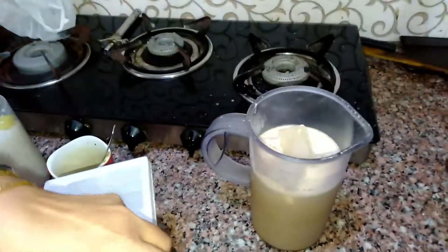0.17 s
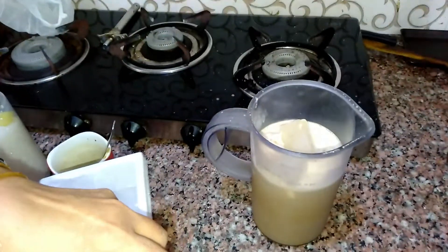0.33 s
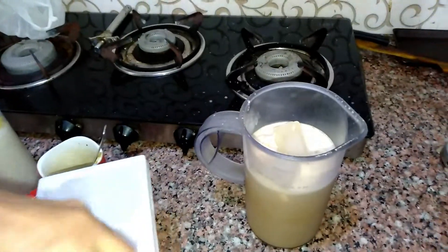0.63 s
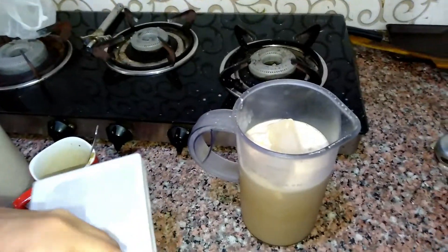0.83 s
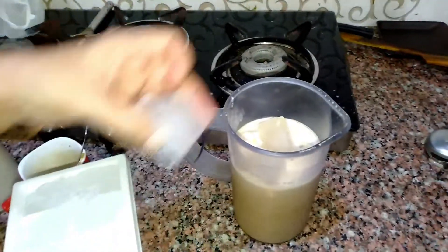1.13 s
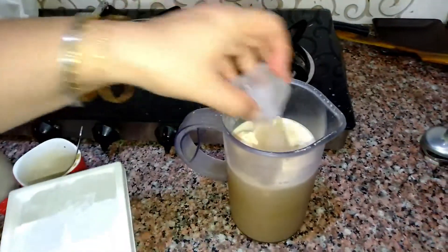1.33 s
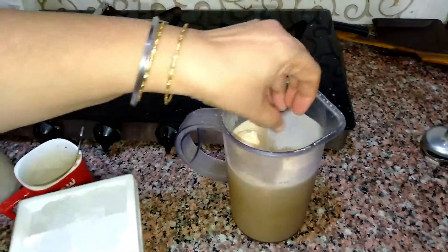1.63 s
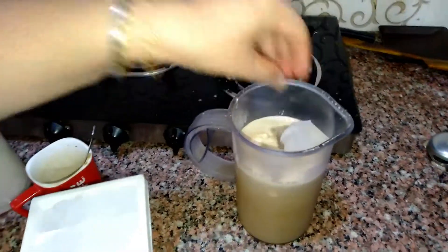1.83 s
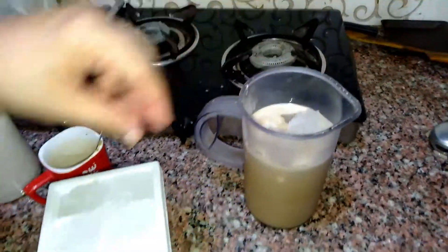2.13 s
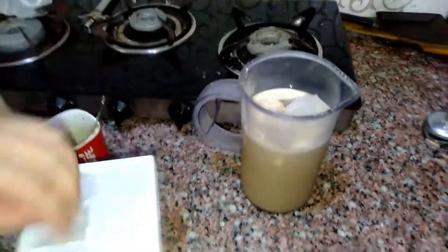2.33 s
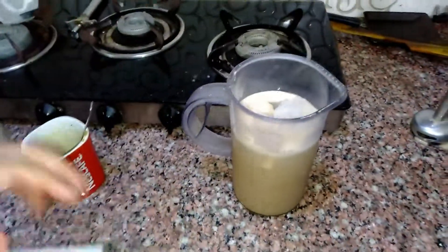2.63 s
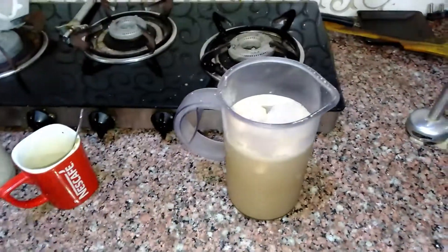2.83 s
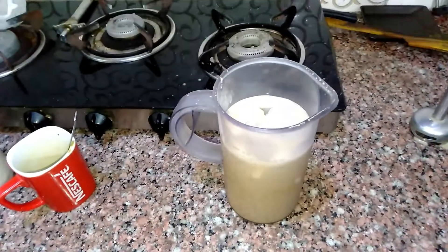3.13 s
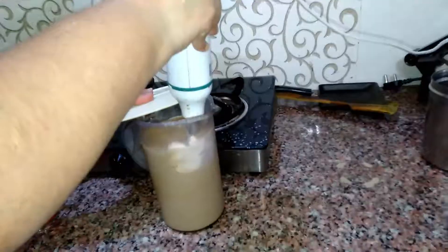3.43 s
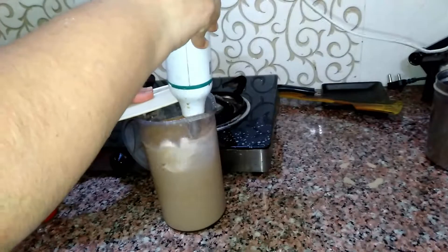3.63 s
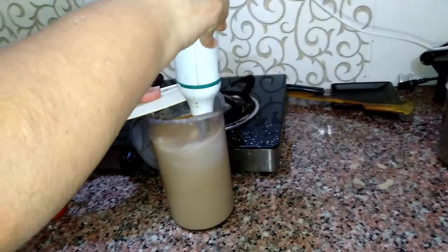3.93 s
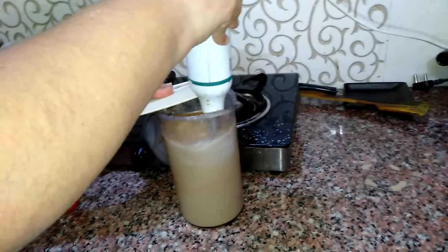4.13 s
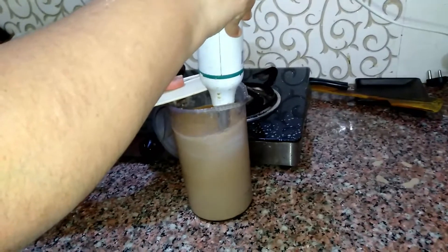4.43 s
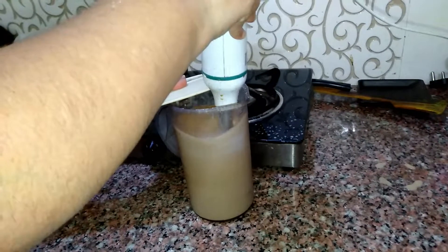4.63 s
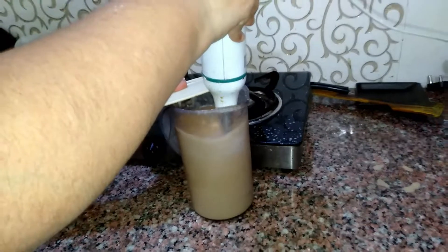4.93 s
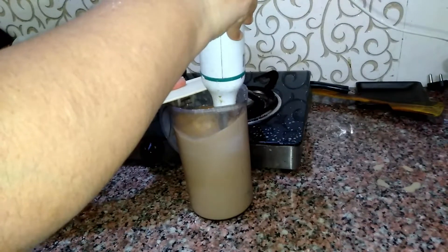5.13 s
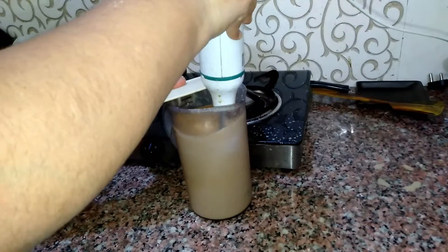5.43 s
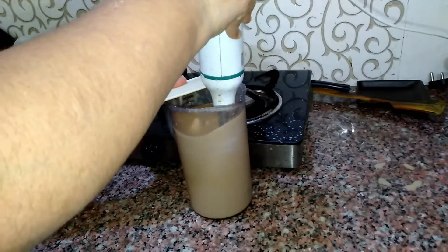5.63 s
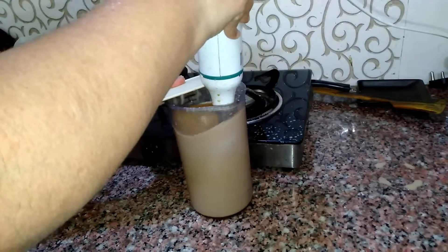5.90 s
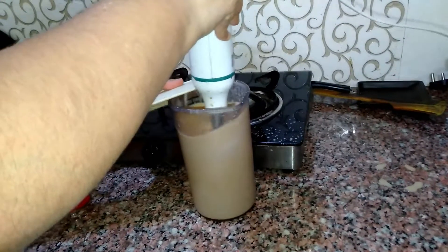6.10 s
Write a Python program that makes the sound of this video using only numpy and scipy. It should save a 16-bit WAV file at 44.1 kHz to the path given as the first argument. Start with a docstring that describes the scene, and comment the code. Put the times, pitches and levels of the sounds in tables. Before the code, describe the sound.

A handheld microphone with a bright, slightly processed sound catches brittle ice snaps and grainy rubbing, then one short hollow knock in a part-filled plastic jug. Quiet handling and faint wavering background tones continue until an electric hand blender suddenly takes over, already running: a thick wandering hum, wet churning and ticking ice chips, its pitch falling sharply near the end.

```python
"""Over faint background noise with a patchy, processed flicker and thin wavering tones, fingers and ice rub in
grainy friction strokes; cubes crack out of a plastic tray as sharp snaps with noise bursts; one knocks into
a plastic jug of cold drink, ringing its modes. Then, abruptly, a hand blender is running in the jug: its hum of
shaft orders wanders in pitch, sinks a little midway, recovers, then drops sharply near the end, while shaped
noise and clicks make the churn, ice chips and fizzing froth."""
import sys
import numpy as np
from scipy import signal
from scipy.fft import rfft, irfft
from scipy.io import wavfile
from scipy.ndimage import uniform_filter1d, minimum_filter1d

SR = 44100
rng = np.random.default_rng(int(sys.argv[2]) if len(sys.argv) > 2 else 0)


def wav_record(signal):
    """Record a signal, one row per channel, as 16-bit PCM in the file named by sys.argv[1]."""
    frames = np.transpose(np.atleast_2d(signal))
    bounded = np.clip(frames, -1, 1)
    # unit amplitude maps onto the largest positive 16-bit level
    quanta = np.round(bounded * 32767).astype(np.int16)
    wavfile.write(sys.argv[1], SR, quanta)


N = 276149
TIME = np.arange(N) / SR
BLEND_S = 3.3715  # the blender takes over


def amp(db):
    """Decibels to gain."""
    return 10 ** (np.asarray(db) / 20)


def unit(x):
    """Scales to rms 1."""
    return x / np.sqrt(np.mean(x ** 2) + 1e-20)


def read(points, hz):
    """Reads a spectrum on a log-frequency axis."""
    f, value = np.transpose(points)
    return np.interp(np.log(hz + 1), np.log(f), value)


def curves(rows):
    """Each column of a control table at every sample."""
    s, *columns = np.transpose(rows)
    return [np.interp(TIME, s, c) for c in columns]


def add(mix, s, sound):
    """Mixes a sound in at time s."""
    part = mix[max(round(s * SR), 0):][:len(sound)]
    part += sound[:len(part)]


def colour(x, gain_db, size=4096):
    """Causal (minimum-phase) filter whose gain in dB is a function of frequency."""
    log_gain = np.log(amp(gain_db(abs(np.fft.fftfreq(size, 1 / SR)))))
    taps = np.fft.ifft(np.exp(np.conj(signal.hilbert(log_gain)))).real
    return signal.oaconvolve(x, taps)[:len(x)]


def drift(rate_hz):
    """Smooth chance of rms 1 that changes about rate_hz times a second."""
    count = N // 100
    hz = np.fft.rfftfreq(count, N / SR / count)
    lowpass = np.exp(-(hz / rate_hz) ** 2)
    slow = irfft(rfft(rng.standard_normal(count)) * lowpass, count)
    return unit(np.interp(TIME, np.linspace(0, N / SR, count), slow))


def grains(per_s, spread_db):
    """Random clicks of rms 1 overall, a few of them much larger than the rest."""
    size = amp(spread_db * np.minimum(rng.exponential(1, N), 4))
    sign = rng.choice([-1, 1], N)
    return unit(size * sign * (rng.random(N) < per_s / SR))


def background(level_db=-50.5, patchy_db=3):
    """Faint noise with a patchy, processed flicker, as from noise suppression, least in the top treble."""
    # background noise: f/Hz, relative density/dB
    noise_spectrum = [(15, -3.5), (32, 15.5), (60, -17), (105, -0.5), (150, -16.5), (220, -11),
                      (320, -17.5), (550, -15), (800, -18.5), (1250, -9.5), (2000, -15.5), (3200, -24),
                      (9000, -32), (16000, -28)]
    hz, _, z = signal.stft(rng.standard_normal(N), SR, nperseg=2048)
    blur = np.outer(np.hanning(14), np.hanning(9))
    patches = unit(signal.fftconvolve(rng.standard_normal(z.shape), blur, "same"))
    depth = read([(300, 0.97), (1300, 1.0), (6000, 1.0), (10000, .2)], hz)  # f/Hz, share of patchy_db
    z = z * amp(read(noise_spectrum, hz)[:, None] + patchy_db * depth[:, None] * patches)
    return amp(level_db) * unit(signal.istft(z, SR, nperseg=2048)[1][:N])


def tones():
    """Faint narrow bands, two drifting quadrature carriers each, that waver and fade in and out."""
    # background tones: mid-fade-in t/s, mid-fade-out t/s, f/Hz, waver rate/Hz, level/dB
    tone_rows = [(0, 1.57, 565, 9, -65), (0.2, 1.6, 224, 12, -65.5), (0.7, 1.6, 796, 12, -67),
                 (1.9, 3.23, 1188, 48, -59), (2.4, 2.9, 1370, 33, -59.5)]
    out = np.zeros(N)
    for start, end, hz, width_hz, db in tone_rows:
        fade = np.interp(TIME, [start - .1, start + .1, end - .1, end + .1], [0, 1, 1, 0])
        angle = 2 * np.pi * hz * TIME
        band = drift(width_hz) * np.cos(angle) + drift(width_hz) * np.sin(angle)
        out += amp(db) * fade * unit(band)
    return out


def rustles(count=22, scatter_db=5, treble_db_per_octave=-3):
    """Rows of light touches while the hand is busy, fading as it withdraws, the higher ones fainter."""
    handling_s, mean_length_s = 2.7, 0.05
    start_db, fade_db_per_s = -54.5, -0.7
    low_hz, high_hz, half_width_octaves = 910, 7050, 0.25
    when, long, loud, pitch = rng.random((count, 4)).T
    s = handling_s * (np.arange(count) + when) / count
    hz = low_hz * (high_hz / low_hz) ** pitch
    db = start_db + fade_db_per_s * s + scatter_db * (loud - .5)
    db = db + treble_db_per_octave * np.maximum(np.log2(hz / 1500), 0)
    return list(zip(s, mean_length_s * (.5 + long), db, hz, [half_width_octaves] * count))


def rubs(level_db=-1):
    """Grainy friction, band-filtered, that swells and fades with each stroke."""
    # firmer rubs of fingers, ice, tray and counter:
    # peak t/s, length/s (rise + fall sigma), relative level/dB, centre f/Hz, half-width/octave (to -2.4 dB)
    rub_rows = [(0.027, .06, -55, 3500, 1.2), (0.11, .045, -48, 430, 0.036), (0.172, .025, -50, 3960, 0.2),
                (0.3, 0.058, -47.5, 5500, 0.8), (0.352, 0.031, -26.5, 2880, 0.5),
                (.44, 0.059, -42, 4030, 0.63), (0.52, 0.11, -39, 1550, 0.39),
                (0.541, 0.041, -32, 2200, 1.16), (0.686, 0.071, -46.5, 1720, 0.92),
                (.82, 0.016, -45, 1020, 0.23), (.94, 0.085, -51, 1400, 0.3),
                (1.284, 0.046, -51.5, 2900, 0.43), (1.408, .045, -43.5, 1370, 0.22),
                (1.584, 0.028, -47, 2460, 0.2), (1.657, 0.058, -45, 990, 0.18),
                (2.721, 0.067, -47, 2820, 0.75), (2.985, 0.1, -48.5, 197, 0.21),
                (3.264, .052, -42, 2700, 0.49)]
    rise_share = 0.28
    out, t = np.zeros(N), TIME[:SR // 2] - 1 / 4
    friction = grains(per_s=3300, spread_db=3.5)
    for s, length_s, db, centre_hz, octaves in [*rub_rows, *rustles()]:
        def band_db(hz):
            offset = np.log2((hz + 20) / centre_hz) / octaves / 2.6
            return -40 * np.log10(1 + np.minimum(offset, 9) ** 2)

        grit = friction[round(s * SR):][:len(t)]
        sigma_s = length_s * np.where(t < 0, rise_share, 1 - rise_share)
        stroke = amp(db + level_db) * unit(colour(grit, band_db)) * np.exp(-(t / sigma_s) ** 2 / 2)
        add(out, s + t[0], stroke[s + t >= 0])
    return out


def cracks(level_db=-12.0, snap_db=14, tray_db=-21, tray_s=0.028):
    """Each fracture is one sharp snap and a burst; duller cracks last longer and rattle the tray more."""
    # ice cracking in the tray and between the fingers: t/s, relative level/dB, tilt/(dB/octave)
    crack_rows = [(0.0467, -21, -1.5), (0.05, -18.5, -2), (0.16, -30, -6), (0.197, -12, -4),
                  (0.3236, -15.5, -1.5), (0.332, -12, 3), (0.3425, -12, 2.5), (0.3475, -15, 6),
                  (0.3639, -10.5, -2.5), (0.401, -4, 0.5), (0.427, -9, -0.5), (0.4435, -26, -5.5),
                  (0.4634, -22, 1), (0.5157, -22, 0), (0.531, -4.5, 1.5), (0.5434, -7, 0.5),
                  (0.657, -33, 9), (0.673, -33, 5), (1.1857, -39, 10), (2.7116, -33.5, -8.5)]
    # ice spectrum: f/Hz, relative density/dB
    ice_spectrum = [(200, -43), (600, -16), (1400, -1.5), (2600, -0.5), (4500, -1), (7000, 3.5),
                    (10000, -11.5), (16000, 1)]
    flat_decay_s, dull_db_per_octave = 0.0029, 5  # decay at zero tilt; downward tilt stretching it e times
    out, t = np.zeros(N), TIME[:4096]
    for s, db, tilt in crack_rows:
        stretch = np.exp(-tilt / dull_db_per_octave)
        rattle = amp(tray_db) * np.sqrt(stretch) * np.exp(-t / tray_s)
        burst = rng.standard_normal(len(t)) * (np.exp(-t / flat_decay_s / stretch) + rattle)
        burst[0] += amp(snap_db)
        crack = colour(burst, lambda hz: read(ice_spectrum, hz) + tilt * np.log2((hz + 300) / 6000))
        add(out, s, amp(db + level_db) * crack)
    return out


def knocks(level_db=-3, tick_db=-12, tick_s=0.0043):
    """The cube rings the jug's modes; a harder contact passes more of the high modes and the glassy tick."""
    # cube knocking in the jug and settling: t/s, relative level/dB, -6 dB contact f/Hz, jug pitch factor
    knock_rows = [(1.62, -19, 2400, 1.07), (1.641, -33, 3000, 1.07), (1.678, -24, 1200, 1.07),
                  (1.6857, -18.5, 10900, 1), (1.687, -28, 1540, 1.3)]
    # jug modes: f/Hz at pitch factor 1, relative level/dB, t60/s
    jug_modes = [(137, -9, .08), (632, -19, 0.15), (723, -17, 0.11), (863, -1, 0.026), (990, 4, 0.015),
                 (1160, -11, .018), (1500, -28, 0.0092), (1710, -2, 0.019), (1870, -8, 0.02),
                 (2250, -27, .015), (3930, -8, 0.011), (4400, -25, .012), (6120, -7, 0.015),
                 (7030, -11, 0.019)]
    out, t = np.zeros(N), TIME[:SR // 4]
    for s, db, bright_hz, pitch in knock_rows:
        def blow_db(hz):
            contact = 1 + (hz / bright_hz) ** 2  # the contact time rounds off the treble
            small_jug = 1 + (240 / (hz + 5)) ** 2  # a small jug radiates little bass
            return -20 * np.log10(contact * small_jug)

        ring = sum(amp(mode_db - 60 * t / t60) * np.cos(2 * np.pi * hz * pitch * t)
                   for hz, mode_db, t60 in jug_modes)
        ring *= 1 - np.exp(-t / 0.00025)  # the wall takes a moment to get moving
        tick = amp(tick_db) * np.diff(rng.standard_normal(len(t)) * np.exp(-t / tick_s), prepend=0)
        add(out, s, amp(db + level_db) * colour(ring + tick, blow_db))
    return out


def kitchen(x):
    """Sparse reflections off tiles and counter, whose decay time varies with frequency."""
    # reverberation: f/Hz, t60/s
    room_t60 = [(100, 0.12), (1000, 0.29), (4000, 0.31), (16000, 0.18)]
    t = TIME[:SR // 2]
    taps = rng.standard_normal(len(t)) * (rng.random(len(t)) < .1) * (t > .003)
    hz, frame_s, z = signal.stft(taps, SR, nperseg=256)
    decay = amp(-60 * frame_s / read(room_t60, hz)[:, None])
    tail = signal.istft(z * decay, SR, nperseg=256)[1]
    return signal.oaconvolve(x, tail / np.linalg.norm(tail))[:N]


def resonance_db(hz):
    """How much the filled jug and the blender's shaft reinforce a frequency."""
    # resonances: f/Hz, half-power width/Hz, added power over the base/dB
    jug_peaks = [(685, 14, 5), (900, 18, -2), (937, 16, 4), (1012, 24, 0), (1150, 18, 2), (1268, 14, 2),
                 (1315, 20, 5), (1372, 20, 0), (1458, 14, 0), (1555, 20, 0), (1690, 18, 3), (1888, 20, 4),
                 (2115, 22, 5), (2327, 18, 3), (2705, 26, 3), (3600, 30, -1), (4010, 30, -1),
                 (4120, 30, -1)]
    added = sum(amp(db) ** 2 / (1 + (2 * (hz - f) / width) ** 2) for f, width, db in jug_peaks)
    return 10 * np.log10(1 + added)


def jug_gain_db(hz):
    """The churn's broad spectrum with the narrow resonances on top."""
    # churning liquid: f/Hz, relative density/dB
    churn_spectrum = [(25, -34.5), (52, -39), (75, -27), (110, -21.5), (155, -26), (220, -12), (295, -19),
                      (410, -11), (480, -6), (740, -8.5), (860, 3.5), (1200, -6), (1450, -3.5), (2400, -11),
                      (3000, -26), (4500, -44.5)]
    return read(churn_spectrum, hz) + resonance_db(hz)


def hum(angle, speed, load, flutter=0.25, upper_flutter=0.45, flutter_hz=16, smear=0.03, swell_db=1.0,
        swell_hz=6, others_db=-1.0, damping_db_per_s=1.0):
    """Fluttering shaft orders; weak ones swell on resonances, the thickening drink damps the high ones."""
    # strong orders: multiple, level/dB, by load/(dB/dB), by speed/(dB/Hz), by time as drink thickens/(dB/s)
    main_orders = [(1, -39.5, 2.4, 0.3, 2.6), (2, -30.5, 0, 0.45, -1.5), (3, -28, 0.5, 0.33, 3.5),
                   (4, -17, -1.76, 0.55, 1.5)]
    # weak higher orders: multiple, relative level/dB
    weak_orders = [(5, -23.5), (6, -29), (7, -48), (8, -34), (9, -36.5), (10, -35.5), (11, -33), (12, -36),
                   (13, -43), (15, -41), (17, -40.5), (18, -43), (19, -47)]
    usual_hz, midway_s = 208, 4.8
    grid, late = np.arange(SR // 8), TIME - midway_s
    boost_db = resonance_db(grid)
    parts = []
    for k, db, by_load, by_speed, by_time in main_orders:
        db = db + by_load * load + by_speed * (speed - usual_hz) + by_time * late
        parts.append((round(k), db + swell_db * drift(swell_hz), flutter))
    for k, db in weak_orders:
        damping = damping_db_per_s * late * np.log2(k / weak_orders[0][0])
        boost = np.interp(round(k) * speed, grid, boost_db)
        parts.append((round(k), db + others_db - damping + boost, upper_flutter))
    shaft = angle + smear * drift(17.0)
    out = np.zeros(N)
    for k, db, depth in parts:
        level = amp(db) * (1 + depth * drift(flutter_hz))
        out += level * np.cos(k * shaft + 2 * np.pi * rng.random() + depth * drift(flutter_hz))
    return np.sqrt(2) * out


def blender(churn_db=-14.0, froth_db=-24.5, vortex_db=0, churn_follows=0.91, froth_follows=0.84,
            churn_db_per_s=-0.37, slap=0.3, froth_slap=0.25, chips=0.43, lump_db=0.84, start_db=-3,
            start_s=0.027):
    """The blade slaps once a turn; chips tick and froth fizzes, louder with load; a vortex throbs."""
    # shaft speed: wanders, sinks a little midway, recovers, drops sharply near the end: t/s, f/Hz
    speed_rows = [(3.37, 210.9), (3.75, 212), (3.94, 209.8), (4.44, 210.1), (4.85, 207.2), (5.01, 208),
                  (5.07, 205.8), (5.28, 205), (5.45, 207.8), (5.89, 209.2), (5.98, 207.8), (6.04, 193.6),
                  (6.25, 195.2)]
    # bite into ice and liquid: t/s, load about usual/dB
    load_rows = [(3.43, 2.2), (3.55, -1), (3.65, 3.5), (3.93, 2.4), (3.99, 2), (4.11, -1.4), (4.17, 2.5),
                 (4.37, 1.8), (4.51, -2), (4.77, 0.6), (4.91, -3.1), (4.99, -1.5), (5.07, 0.9), (5.23, 1.6),
                 (5.61, -2), (5.81, 0.6), (6.01, -1.4), (6.21, 3.7)]
    # vortex throbbing in the jug: t/s, centre f/Hz, level/dB
    vortex_rows = [(3.37, 86, -42), (3.72, 85.8, -44), (4.2, 83.7, -50), (4.7, 83.4, -53.5),
                   (4.79, 81.1, -38), (5.0, 78.6, -41), (5.2, 70.1, -46.5), (5.8, 84.4, -47.5),
                   (6.25, 84.5, -48)]
    # froth: f/Hz, relative density/dB
    froth_spectrum = [(1200, -37.5), (2600, 0.5), (3500, -1), (4200, -2), (5000, -6.5), (7000, -9.5),
                      (10000, -17.5), (16000, -15)]
    (speed,), (load,) = curves(speed_rows), curves(load_rows)
    angle = 2 * np.pi * np.cumsum(speed) / SR
    stroke = ((1 + np.cos(angle)) / 2) ** 4
    ticks = chips * grains(per_s=700, spread_db=4)
    lumps = amp(lump_db * drift(23))

    churn = (rng.standard_normal(N) + ticks) * (1 + slap * stroke) * lumps
    churn_level = churn_db + churn_follows * load + churn_db_per_s * (TIME - 4.8)
    churn = amp(churn_level) * unit(colour(churn, jug_gain_db))

    # the froth pulses twice a turn
    fizz = (rng.standard_normal(N) + ticks) * (1 + froth_slap * np.cos(angle) ** 2) * np.sqrt(lumps)
    froth = colour(fizz, lambda hz: read(froth_spectrum, hz) + resonance_db(hz))
    froth = amp(froth_db + froth_follows * load) * unit(froth)

    vortex_hz, vortex_level = curves(vortex_rows)
    vortex_angle = 2 * np.pi * np.cumsum(vortex_hz + 4 * drift(16.3)) / SR
    vortex = unit((1 + 0.25 * drift(10)) * np.sin(vortex_angle))

    swell = amp(start_db * np.exp(-np.maximum(TIME - BLEND_S, 0) / start_s))
    return swell * (hum(angle, speed, load) + churn + froth) + amp(vortex_level + vortex_db) * vortex


def scene(crack_room_db=-7, knock_room_db=-6):
    """Ice from the tray and into the jug in a kitchen; then the blender takes over."""
    ice, jug = cracks(), knocks()
    room = kitchen(amp(crack_room_db) * ice + amp(knock_room_db) * jug)
    handling = background() + tones() + rubs() + ice + jug + room
    return np.where(TIME < BLEND_S, handling, blender())[None]


def record(dry):
    """Microphone colour, a fast limiter just below full scale and the band limit."""
    # microphone port resonances: f/Hz, gain/dB
    mic_response = [(5200, 0.5), (6700, 9), (8300, 1.5), (11000, 1.5), (12200, 6.5), (12800, 1.5),
                    (14000, 1.5), (15600, 15)]
    edge_hz = 15760
    heard = colour(dry[0], lambda hz: read(mic_response, hz))
    needed = 1 / np.maximum(abs(heard) / .95, 1)
    heard = heard * uniform_filter1d(minimum_filter1d(needed, size=200), size=200)
    lowpass = signal.firwin(1023, edge_hz, window=("kaiser", 8), fs=SR)
    return signal.oaconvolve(heard, lowpass, "same")[None]


dry = scene()
out = record(dry)
wav_record(out)
```